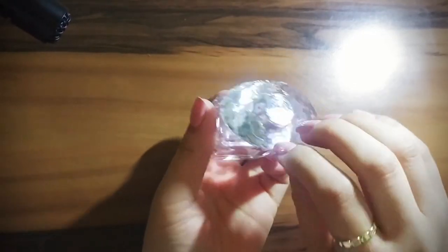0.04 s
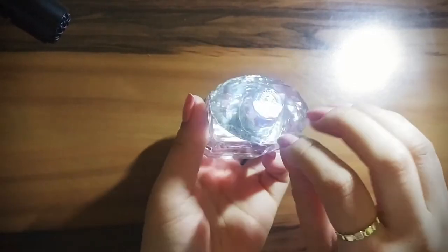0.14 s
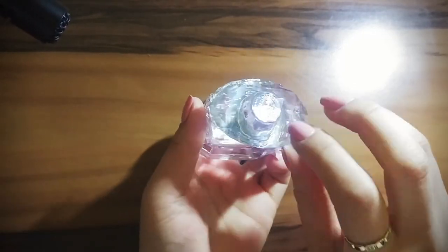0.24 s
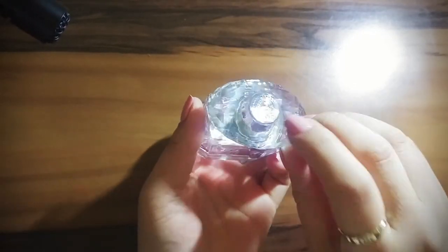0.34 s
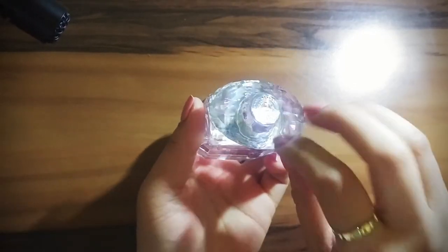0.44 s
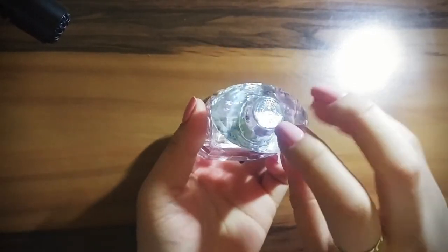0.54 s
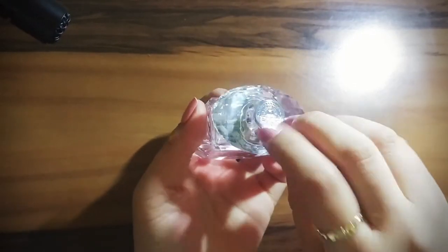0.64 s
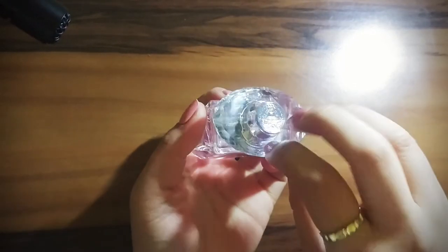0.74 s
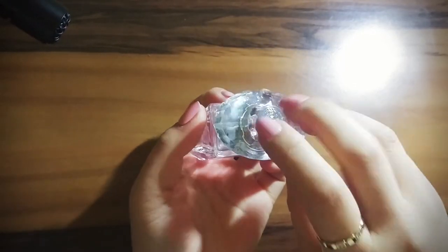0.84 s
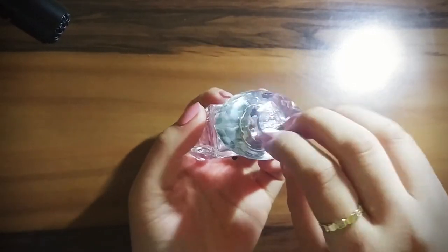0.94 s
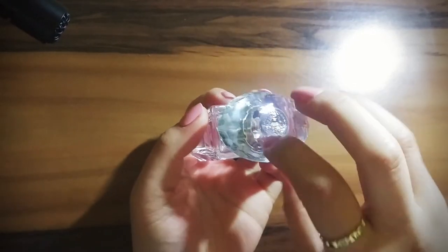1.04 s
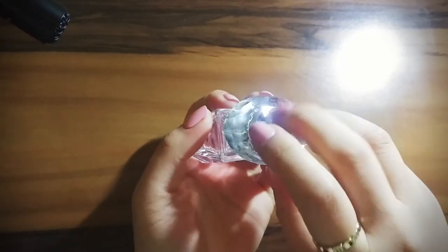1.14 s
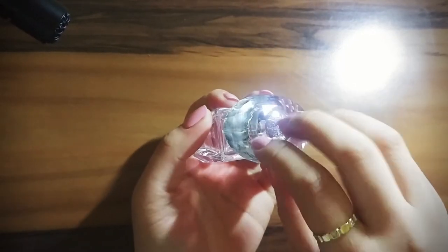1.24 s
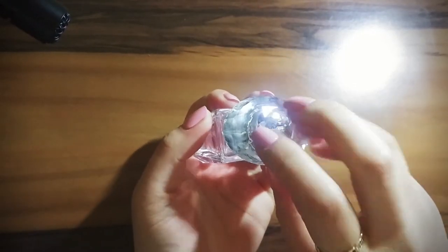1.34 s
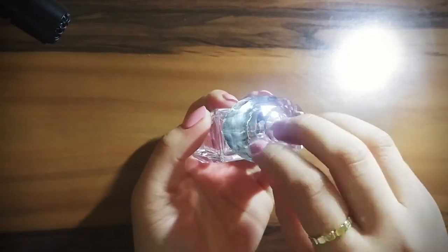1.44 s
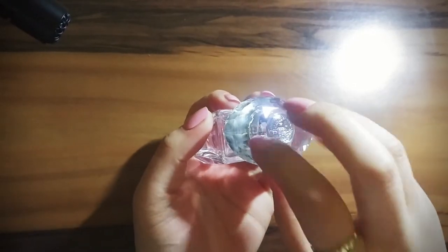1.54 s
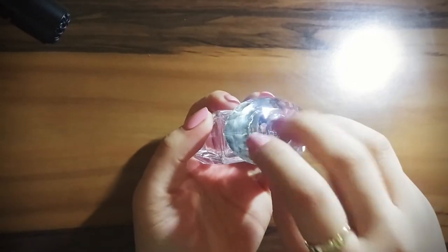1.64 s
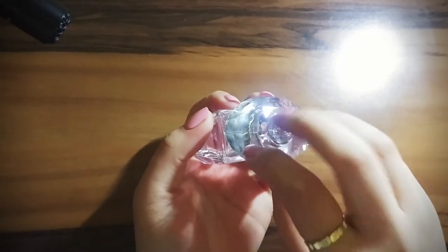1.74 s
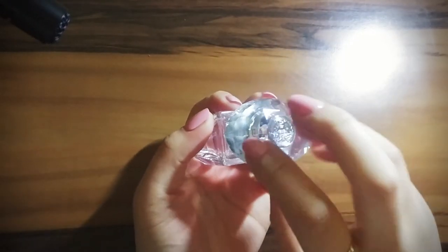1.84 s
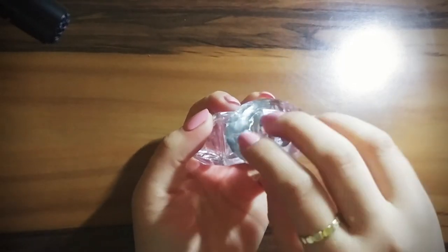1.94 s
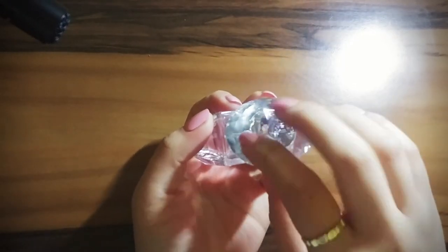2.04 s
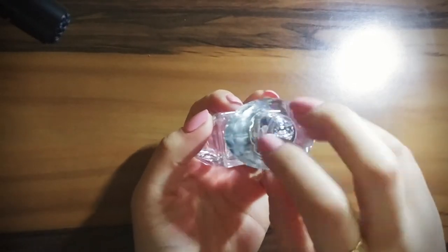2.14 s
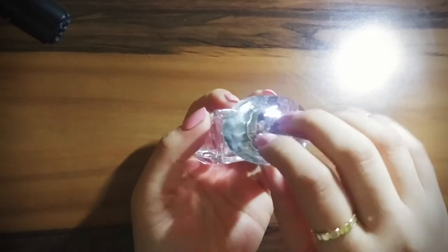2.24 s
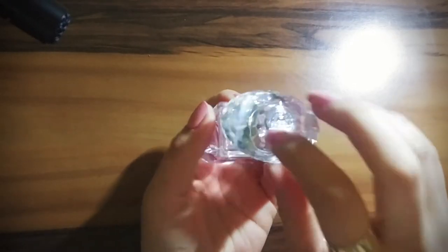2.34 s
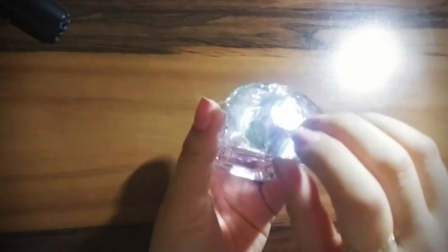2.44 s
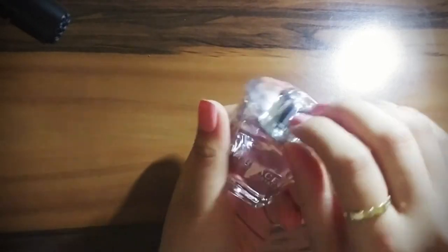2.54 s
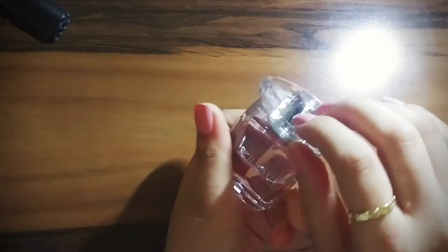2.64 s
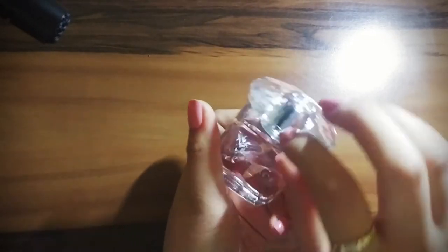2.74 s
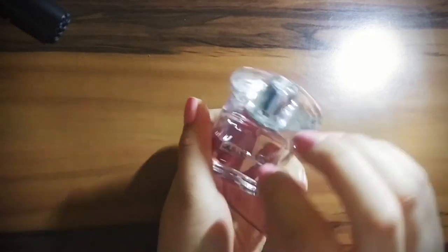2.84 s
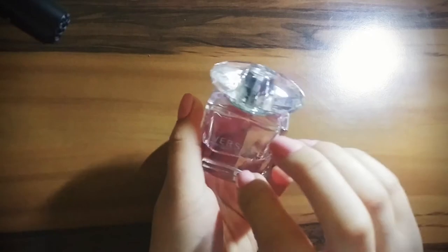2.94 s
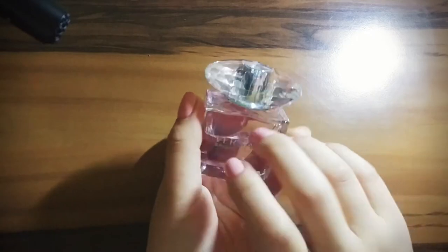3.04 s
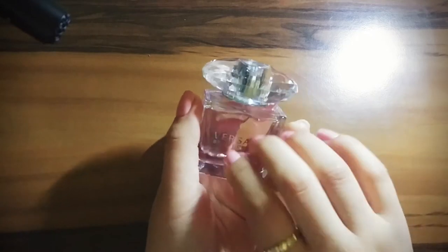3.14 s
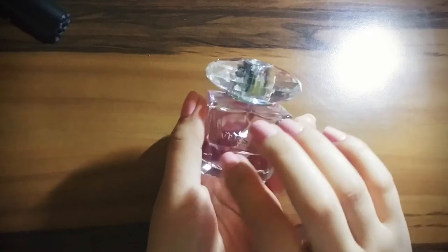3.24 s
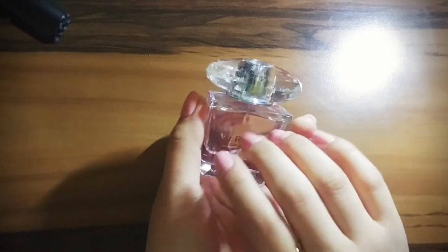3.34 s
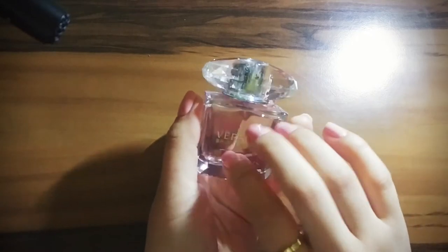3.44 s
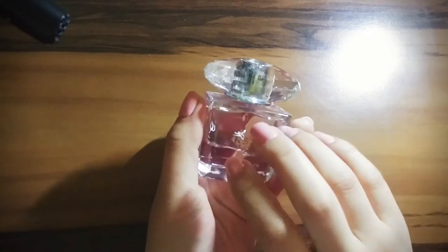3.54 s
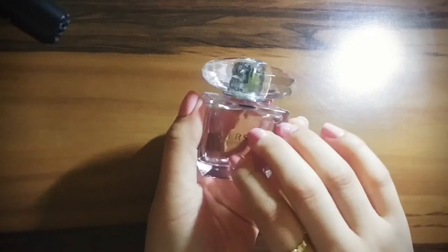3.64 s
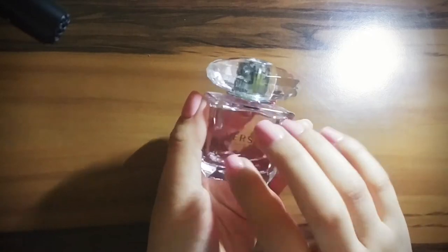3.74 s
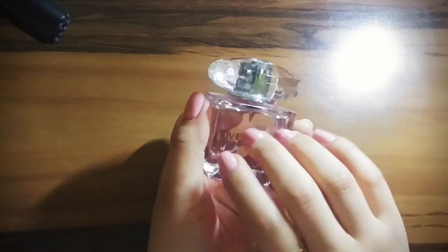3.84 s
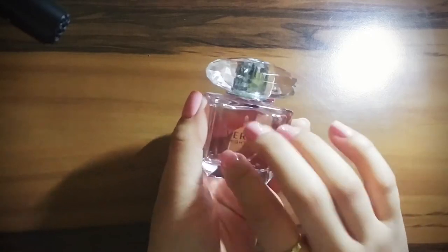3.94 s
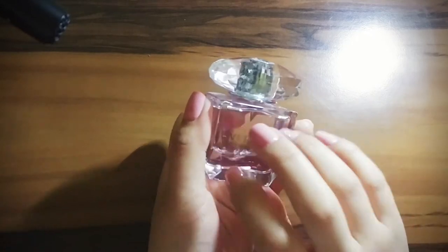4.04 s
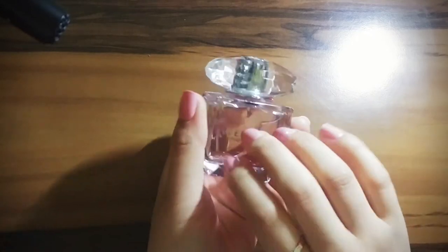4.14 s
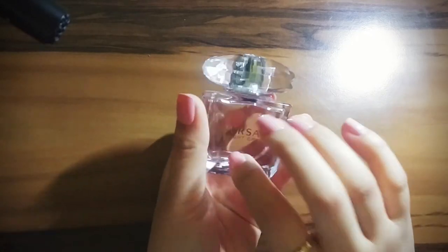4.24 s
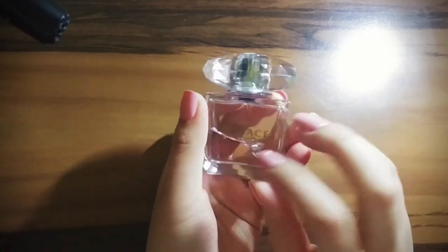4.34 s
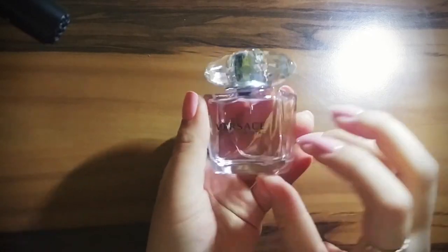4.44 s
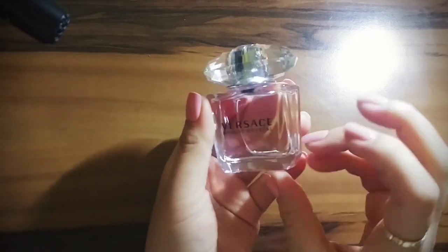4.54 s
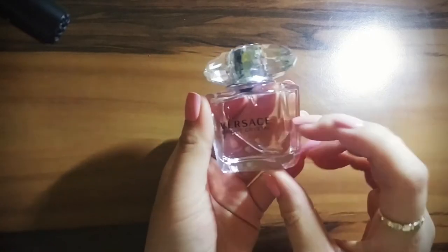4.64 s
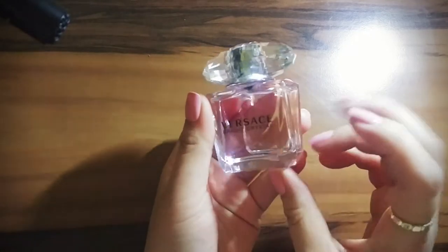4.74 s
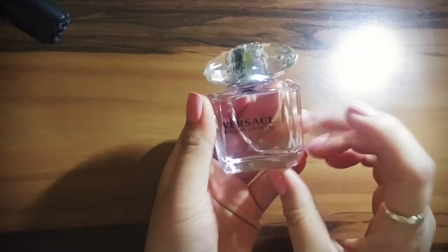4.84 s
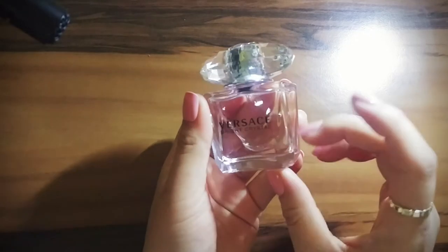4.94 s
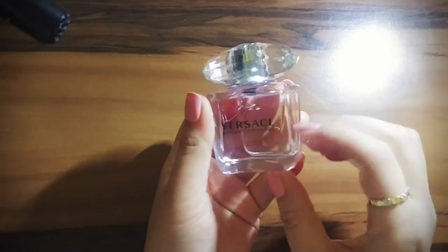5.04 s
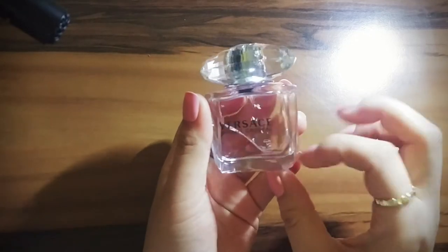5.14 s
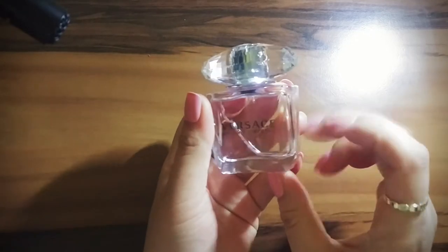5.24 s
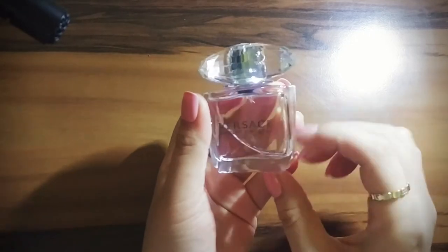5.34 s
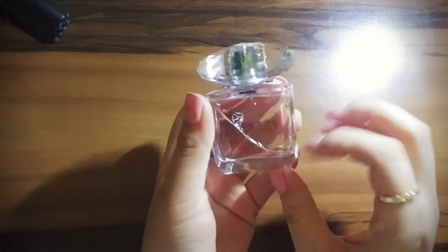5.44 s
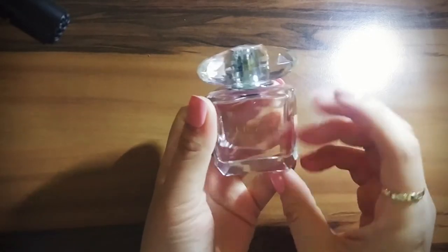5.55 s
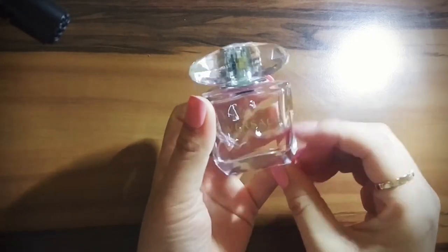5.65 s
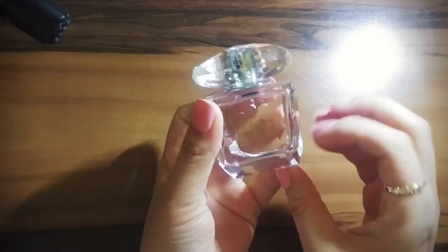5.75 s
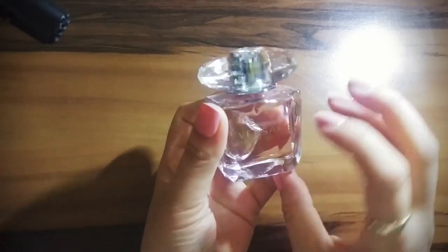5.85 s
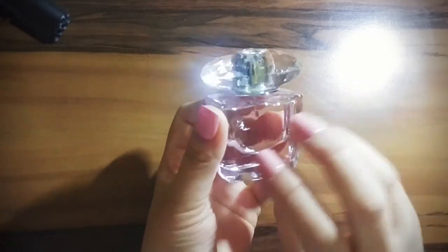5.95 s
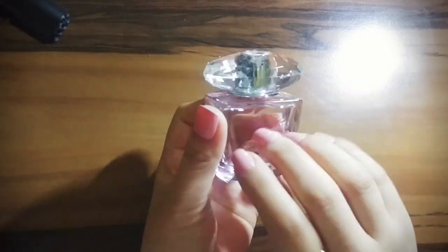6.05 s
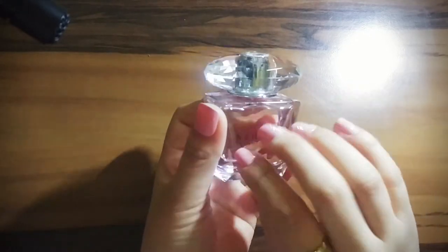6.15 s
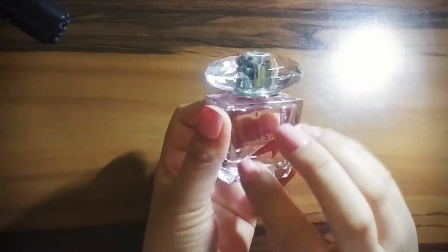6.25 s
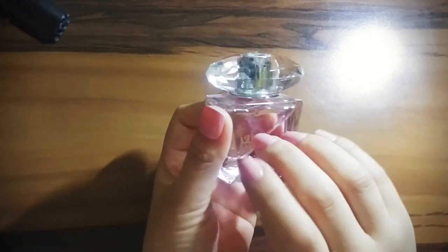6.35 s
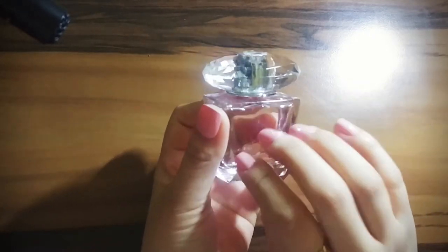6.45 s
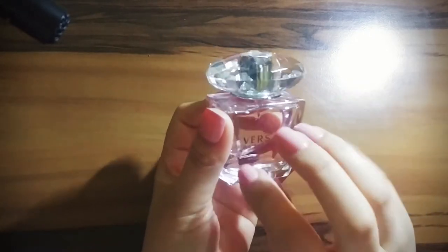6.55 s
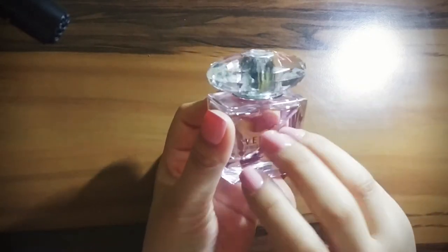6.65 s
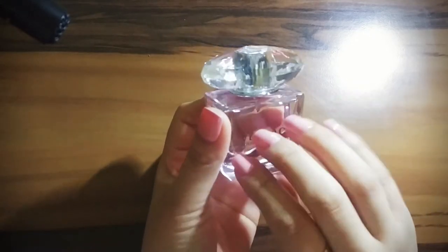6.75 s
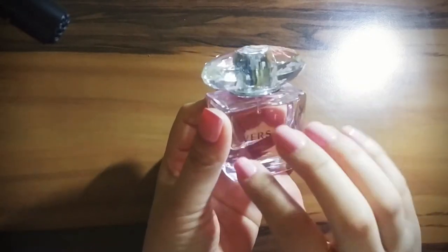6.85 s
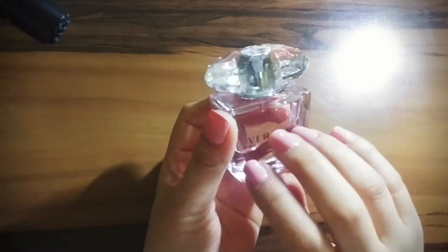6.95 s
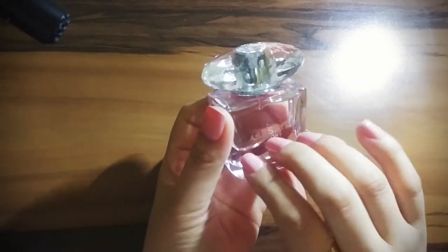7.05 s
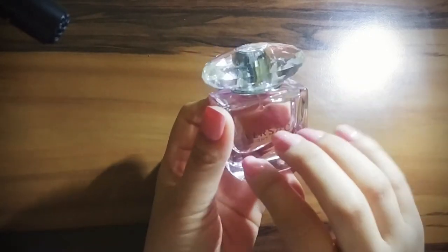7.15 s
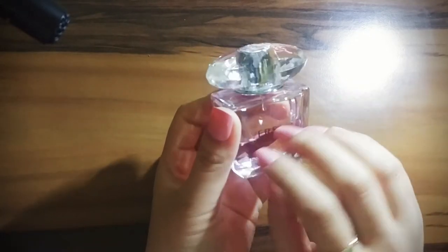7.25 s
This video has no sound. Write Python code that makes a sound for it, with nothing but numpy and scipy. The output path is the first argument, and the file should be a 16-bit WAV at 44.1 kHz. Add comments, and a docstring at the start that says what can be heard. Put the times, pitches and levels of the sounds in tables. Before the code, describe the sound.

Close to the microphone in a small room, fingernails click on a glass bottle's stopper in rapid clusters, about four a second. After a brief pause the tapping moves to the bottle's face, thins to separate, hollower taps on its side, then picks up in clusters again. The glass rings only briefly, stilled by the fingertips. Occasional soft knocks, a short room echo and a faint steady hiss go with it.

```python
"""A small room, a thick glass bottle held in the hand over a table. Long fingernails drum on it in rolls
of two or three, first on the stopper, then on the walls. Each tap is a dry tick of nail and a short ring
of glass, a click with a hollow knock, damped as the fingertip lands. A few dull knocks fall in between.
The table adds a low thud and one close reflection; a short room tail answers over a steady hiss."""
import sys
import numpy as np
from scipy import signal
from scipy.fft import rfft, irfft
from scipy.io import wavfile
from scipy.ndimage import uniform_filter1d

SR = 44100
rng = np.random.default_rng(int(sys.argv[2]) if len(sys.argv) > 2 else 0)


def wrap_up_sound(samples):
    """Save the sound to the file named by the first command line argument, as 16-bit audio."""
    columns = np.atleast_2d(samples).T
    # keep every value between -1 and 1, then stretch to whole-number steps
    tamed = np.clip(columns, -1, 1)
    steps = np.round(tamed * 32767).astype(np.int16)
    wavfile.write(sys.argv[1], SR, steps)


N = 321489

# Nail taps; knock, ring and snap are offsets from the tap's level:
# (time [s], stroke, level [dB], knock against the palm [dB], wall ring [dB], nail snap [dB])
NAIL_TAPS = [(-.012, "stopper 2", -22.5, -4.5, -15, -10.5), (.0471, "stopper 3", -40, -1, -11, -29),
             (.3475, "stopper edge", -16.5, -9, -6.5, -27), (.406, "stopper 3", -31.5, 0, -3, -17),
             (.5906, "stopper edge", -26.5, -8.5, -3, -38), (.6361, "stopper 2", -15, -9.5, -12.5, -5.5),
             (.675, "stopper 3", -16, -7, -9.5, -25), (.843, "stopper 1", -30, -5.5, -2.5, -40),
             (.8878, "stopper 2", -19.5, -8, -10, -2.5), (.9275, "stopper 3", -18.5, -5, -7.5, -23),
             (1.1128, "stopper 1", -17.5, -13.5, -14.5, -24), (1.1769, "stopper 2", -21, -6.5, -17, -8.5),
             (1.2281, "stopper 3", -20, -5, -5, -24), (1.357, "stopper 1", -29, -10.5, -12, -37),
             (1.3654, "stopper 2", -27.5, -8.5, -22, -14.5), (1.4196, "stopper 2", -16, -9, -13, -6),
             (1.4571, "stopper 3", -22, -2.5, -3, -24), (1.621, "stopper 2", -34.5, -6.5, -10, -8),
             (1.6666, "stopper 2", -18, -6.5, -10, -10.5), (1.6856, "stopper 3", -22.5, -4.5, -7, -26),
             (1.8683, "stopper 1", -31, -10, -15, -30), (1.8835, "stopper 2", -23.5, -9, -10, -6.5),
             (1.9248, "stopper 3", -18.5, -6.5, -8.5, -19), (2.1609, "stopper 1", -26, -12.5, -12, -48),
             (2.2063, "stopper 2", -19.5, -7, -10.5, -5), (2.2505, "stopper 3", -15, -8.5, -11, -26),
             (2.395, "stopper 1", -15.5, -17.5, -13.5, -38), (2.4544, "stopper 2", -20, -7.5, -16.5, -24.5),
             (2.507, "stopper 1", -17, -13, -16.5, -31), (3.0491, "face 1", -39, -7.5, -5.5, -24),
             (3.0966, "face 3", -39.5, 2.5, 3, -22), (3.1677, "face 2", -22.5, -1.5, -5.5, -23),
             (3.3358, "face 1", -22, -9, -3, -21), (3.3614, "face 2", -18, -3.5, -1, -13),
             (3.3912, "face 3", -28, -2.5, -5, -16), (3.5523, "face 1", -27.5, -12.5, -4.5, -33),
             (3.6095, "face 2", -21, -2, -2.5, -17), (3.6412, "face 3", -23.5, -1, -4.5, -19),
             (3.8048, "face 1", -22, -14.5, -6, -23), (3.856, "face 2", -16.5, -5, -4.5, -18.5),
             (3.8752, "face 3", -24.5, -0.5, -6.5, -13.5), (4.0695, "face 1", -20, -11, -7.5, -25),
             (4.116, "face 2", -20.5, -3, -3.5, -20), (4.1519, "face 3", -23, -1, -7, -19),
             (4.6398, "side hard", -15.5, -2, -6, -20.5), (4.8582, "side hard", -16.5, -3, -6.5, -18.5),
             (5.0576, "side hard", -22, -1, -4, -32), (5.255, "side soft", -29, 5, 1.5, -27),
             (5.3427, "side hard", -24, 2.5, -1.5, -29), (5.5132, "side soft", -32.5, 3.5, -8.5, -40),
             (5.5781, "side soft", -30.5, 3, -7, -32), (5.6298, "side hard", -24.5, 0, -2.7, -28),
             (6.0116, "face 1", -40.5, -3, 2, -33.5), (6.0553, "face 2", -21, -2, -2, -17),
             (6.0806, "face 3", -28, 1, -2, -13.5), (6.3032, "face 1", -26, -9, -3.5, -28),
             (6.3442, "face 2", -19, -5, -3.5, -14.5), (6.4083, "face 3", -23.5, -0.3, -2, -14),
             (6.6135, "face 1", -27.5, -8, -2, -25), (6.6865, "face 2", -25, 1, 0, -12),
             (6.7431, "face 3", -32.5, 1, -5.5, -25), (6.9131, "face 1", -24, -10, -4.5, -30),
             (6.993, "face 3", -24.5, 0, -3.5, -21), (7.034, "face 2", -23, -6, -9.5, -24),
             (7.1606, "face 1", -25, -6.5, -6.5, -28), (7.208, "face 3", -48, 7.5, 0, -25)]
# Voicing of each stroke, by spot and finger: layer trims, then pitches.
# stroke: (body [dB], upper knock [dB], upper ring [dB], wall clink [dB], air [dB], hollow [dB],
# thud [dB], knock pitch [Hz], body pitch [Hz], click pitch [Hz])
STROKE_VOICING = {"stopper edge": (-0.5, -2.5, -7, -8, -10, -2.5, -36, 533, 2060, 5200),
                  "stopper 1": (2, -7, -6.5, -6, -12, -21.5, -43.5, 504, 2260, 5150),
                  "stopper 2": (-2, -9.5, -3, -7, -21, -20, -45.5, 535, 2361, 5080),
                  "stopper 3": (-4.5, -7, -6.5, -5.5, -8, -15.5, -45.5, 554, 2540, 5430),
                  "face 1": (-1.5, -4.5, -8.5, -5.5, -4.5, -19, -51, 505, 2206, 5202),
                  "face 2": (-2, -4.5, -2, -5.5, -5, -20.5, -51, 555, 2270, 5197),
                  "face 3": (-3.5, -6, -4.5, -4.5, -5, -27, -44.5, 551, 2288, 5200),
                  "side hard": (-6, -2, -7, -2.5, -9, -14, -40.5, 529, 2440, 5220),
                  "side soft": (-8, -2, -9.5, -6, -11, -4, -43, 507, 2334, 5200)}
# Modes of the held bottle:
# (family [0-8], pitch [Hz], trim [dB], t60 [s], attack [s], fingertip damping [0-1])
BOTTLE_MODES = [(0, 5250, 3.5, 0.013, 0.00036, .9), (0, 4750, -3, 0.01, 0.00052, 0.88),
                (1, 401, -1, 0.034, 0.00061, 0.2), (2, 2056, 3.5, 0.01, 0.00084, .9),
                (2, 2737, 4.5, 0.006, 0.00032, .9), (3, 3618, 9.5, 0.0064, 0.00059, 0.6),
                (3, 4340, 10, 0.01, 0.00076, .8), (4, 5917, 9, 0.0085, 0.000098, 1),
                (4, 6576, 8, 0.0046, 0.000082, .9), (4, 7440, 2, 0.0051, 0.000066, 0.8),
                (5, 8730, 8, 0.0043, .0001, .9), (5, 10450, 2.5, 0.0027, .0001, .9),
                (6, 4010, 12, 0.025, 0.0016, 0.05), (7, 1600, 8, 0.007, 0.00026, .9),
                (8, 776, 9.5, 0.017, 0.00031, 0.3), (8, 940, 3, 0.017, 0.00022, .8)]
# EQ of the nail's snap on glass: (frequency [Hz], gain [dB])
SNAP_EQ = [(6500, -30.5), (7500, 1), (9000, -5), (10800, -4), (12000, -14.5)]
# EQ of the air on top of the snap: (frequency [Hz], gain [dB])
AIR_EQ = [(10000, -30.5), (11800, -3), (13300, 2.5), (15300, -5.5), (17000, -7.5)]
# Decay of the room tail: (frequency [Hz], t60 [s])
ROOM_DECAY = [(150, 0.48), (500, 0.23), (1400, 0.23), (3700, 0.14), (5500, 0.16), (9700, 0.18),
              (16000, 0.085)]
# EQ of the room tail: (frequency [Hz], gain [dB])
ROOM_EQ = [(100, -5.5), (500, 2), (1000, 2), (1500, 4), (2400, -6.5), (3200, 3), (4030, -9), (4600, 2.5),
           (5300, 1.5), (6500, 2), (9000, -2), (12000, -2.5), (16000, 5.5)]
# EQ of the noise bed: (frequency [Hz], gain [dB])
HISS_EQ = [(20, -18), (40, 10.5), (60, 8), (120, -6.5), (200, -6), (330, -8), (600, -4.5), (870, -11),
           (1300, -18), (2700, -22), (5000, -24.5), (7800, -31.5), (8800, -39), (12000, -43),
           (15500, -36.5), (17000, -60.5)]
# Knocks of a fingertip or ring, without the nail:
# (time [s], level [dB], pitch [Hz], puff offset [dB], hollow offset [dB])
DULL_KNOCKS = [(.241, -20.5, 597, -31.5, -15.5), (1.765, -35.5, 556, -30, -40), (1.842, -39, 76, -40, -46),
               (1.953, -33, 360, -14, -40), (3.199, -18.5, 554, -16, -5.5), (5.189, -36, 576, -34, -34)]

PRE_ROLL = 2000  # samples
MUTE_AFTER_S, MUTE_DB_PER_S = .0024, 14000  # the fingertip lands behind the nail and stills the glass
UPPER_FOLLOWS_RING, AIR_FOLLOWS_SNAP, THUD_FOLLOWS_LEVEL = 0.49, .8, 0.36  # dB per dB
TABLE_SEND_DB, ROOM_SEND_DB, HISS_DB = -12.0, -13, -49.5


def gain_of(db):
    """Decibels to linear gain."""
    return 10 ** (np.asarray(db) / 20)


def curve_at(points, hz):
    """Read a breakpoint curve on a log frequency axis."""
    point_hz, value = np.transpose(points)
    return np.interp(np.log(hz + 1), np.log(point_hz + 1), value)


def place(track, time_s, sound):
    """Mix a one-shot into a track that has pre-roll."""
    part = track[PRE_ROLL + round(time_s * SR):][:len(sound)]
    part += sound[:len(part)]


def ring(hz, db, t60, attack_s, phase=0, mute=0):
    """Struck modes: sines that swell and die away, faster where the fingertip mutes them."""
    t = np.arange(1536)[:, None] / SR
    attack = (1 - np.exp(-t / attack_s)) ** 2
    fall_db = 60 * t / t60 + np.clip(mute, 0, 1) * MUTE_DB_PER_S * np.maximum(t - MUTE_AFTER_S, 0)
    return (attack * gain_of(db - fall_db) * np.sin(2 * np.pi * hz * t + phase)).sum(1)


def nail_ticks(eq, t60):
    """Nail meets glass: dry bursts of shaped noise, one row per tap."""
    t, hz = np.arange(256) / SR, np.fft.rfftfreq(256, 1 / SR)
    white = rng.standard_normal((len(NAIL_TAPS), 256))
    noise = irfft(rfft(white) * gain_of(curve_at(eq, hz)))
    envelope = (1 - np.exp(-t / .0001)) * gain_of(-60 * t / t60)
    return noise / noise.std(1, keepdims=True) * envelope


def nail_taps():
    """Each tap ticks and rings the same modes, voiced by its stroke. Returns glass and table thuds."""
    family, hz, trim_db, t60, attack_s, mute = np.transpose(BOTTLE_MODES)
    family = family.round().astype(int)
    variations = rng.standard_normal((len(NAIL_TAPS), 3, len(hz)))
    snaps, airs = nail_ticks(SNAP_EQ, t60=0.0055), nail_ticks(AIR_EQ, t60=0.0079)
    glass, thuds = np.zeros((2, N + PRE_ROLL))
    for tap, (detune, level_jitter, phase_jitter), snap, air in zip(NAIL_TAPS, variations, snaps, airs):
        time_s, stroke, level_db, knock_db, ring_db, snap_db = tap
        *trims_db, knock_hz, body_hz, click_hz = STROKE_VOICING[stroke]
        body, upper_knock, upper_ring, clink, air_trim, hollow, thud = trims_db
        family_db = np.array([0, knock_db, knock_db + body,  # family 0 is the click
                              ring_db, upper_ring + UPPER_FOLLOWS_RING * ring_db, snap_db,
                              ring_db + clink, hollow, knock_db + upper_knock])
        mode_db = level_db + trim_db + family_db[family] + 1.1 * level_jitter
        phase = np.pi * (np.arange(len(hz)) % 2) + 0.5 * phase_jitter  # neighbours alternate polarity
        spot_hz = np.where(family == 0, hz * click_hz / hz[0], hz)  # the click moves with the spot
        modes = ring(spot_hz * (1 + 0.01 * detune), mode_db, t60, attack_s, phase, mute)
        palm_knock = ring(knock_hz, level_db + knock_db + 10.5, t60=0.017, attack_s=0.0003, mute=0.4)
        body_tone = ring(body_hz, level_db + knock_db + body + 10, t60=0.0098, attack_s=0.00025, mute=1)
        place(glass, time_s, modes + palm_knock + body_tone)
        air_db = air_trim + AIR_FOLLOWS_SNAP * snap_db
        tick = gain_of(snap_db + 5) * snap + gain_of(air_db + 7.5) * air
        place(glass, time_s, gain_of(level_db) * tick)
        thud_db = thud + THUD_FOLLOWS_LEVEL * level_db
        place(thuds, time_s, ring(68.4, thud_db + 23.5, t60=0.048, attack_s=0.00086))
    low_cut = signal.butter(2, 280, "highpass", fs=SR, output="sos")  # a small bottle radiates little bass
    return signal.sosfilt(low_cut, glass), thuds


def table_reflection(glass):
    """One dull bounce off the table top."""
    delayed = np.roll(glass, round(.0016 * SR))
    return signal.lfilter(*signal.butter(1, 6000, fs=SR), delayed)


def room_tail(send):
    """Sparse wall echoes of random polarity; three tails crossfade, as the hands keep moving."""
    size, wet = SR // 2, np.zeros(len(send))
    hz, t = np.fft.rfftfreq(256, 1 / SR)[:, None], np.arange(size) / SR
    fade_in = np.clip((t - .0025) / 0.0046, 0, 1)  # the walls answer after a few ms
    crossfade_phase = 2 * np.pi * 7.3 * np.arange(len(send)) / SR
    for k in range(3):
        echoes = np.zeros(size)
        slots = np.arange(0, size - 16, 16)
        echoes[slots + rng.integers(0, 16, len(slots))] = rng.choice([-1., 1.], len(slots))
        _, frame_s, spectra = signal.stft(echoes, SR, nperseg=256)
        shape_db = curve_at(ROOM_EQ, hz) - 60 * frame_s / curve_at(ROOM_DECAY, hz)
        tail = signal.istft(spectra * gain_of(shape_db), SR, nperseg=256)[1][:size] * fade_in
        share = np.sqrt(2 / 3) * np.cos(crossfade_phase + k * 2 * np.pi / 3)
        wet += signal.oaconvolve(send * share, tail / np.linalg.norm(tail))[:len(send)]
    return wet


def hiss():
    """A bed of room tone and microphone noise, with faint drifting patches in its spectrum."""
    frames, hz = N // 256 + 5, np.fft.rfftfreq(1024, 1 / SR)
    real, imag, patches = rng.standard_normal((frames, 513, 3)).T
    patches = uniform_filter1d(uniform_filter1d(patches, 12, axis=0), 14, axis=1)
    shape_db = curve_at(HISS_EQ, hz)[:, None] + 1.23 * patches / patches.std()
    bed = signal.istft((real + 1j * imag) * gain_of(shape_db), nperseg=1024, noverlap=768)[1][:N]
    return bed / bed.std()


def dull_knocks():
    """Soft contacts: a short low ring, a puff of mid noise and at times a hollow overtone."""
    track, t = np.zeros(N + PRE_ROLL), np.arange(1536) / SR
    mids = signal.butter(4, [1100, 4200], "bandpass", fs=SR, output="sos")
    for time_s, level_db, hz, puff_db, hollow_db in DULL_KNOCKS:
        envelope = gain_of(level_db + puff_db + 12.5 - 60 * t / 0.031)
        puff = signal.sosfilt(mids, rng.standard_normal(1536)) * envelope
        low = ring(hz * np.array([1, 1.4]), level_db + np.array([3, -5]), t60=12 / hz, attack_s=0.64 / hz)
        hollow = ring(1430, level_db + hollow_db, t60=0.033, attack_s=0.0013)
        place(track, time_s, low + puff + hollow)
    return track


def scene():
    """Mono mix: the close bottle and table, the room tail behind them, the hiss underneath."""
    glass, thuds = nail_taps()
    knocks = dull_knocks()
    close = glass + gain_of(TABLE_SEND_DB) * table_reflection(glass) + thuds + knocks
    reverb = gain_of(ROOM_SEND_DB) * room_tail(glass + knocks)
    return ((close + reverb)[PRE_ROLL:] + gain_of(HISS_DB) * hiss())[None]


def record(dry):
    """The small microphone thins the bass; a steep high cut trims the very top."""
    low_cut = signal.butter(2, 160, "highpass", fs=SR, output="sos")
    high_cut = signal.firwin(511, 16700, window=("kaiser", 9), fs=SR)
    return signal.oaconvolve(signal.sosfilt(low_cut, dry), high_cut[None], "same")


dry = scene()
out = record(dry)
wrap_up_sound(out)
```